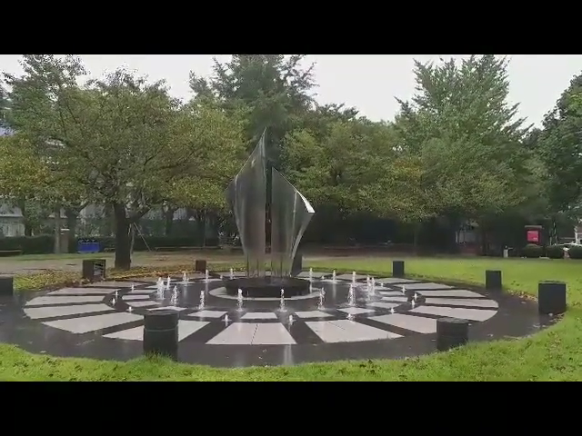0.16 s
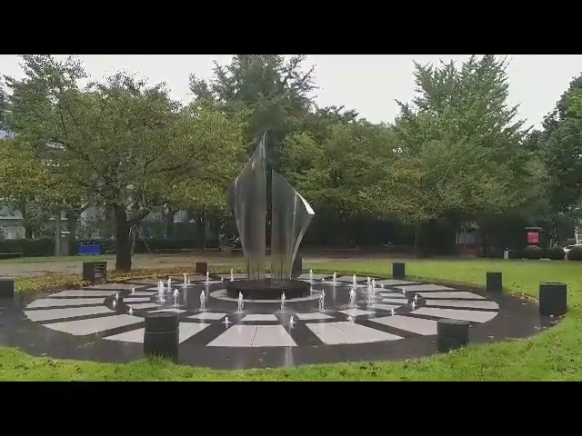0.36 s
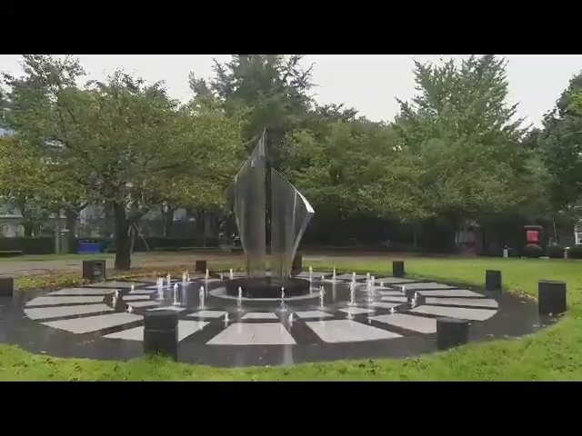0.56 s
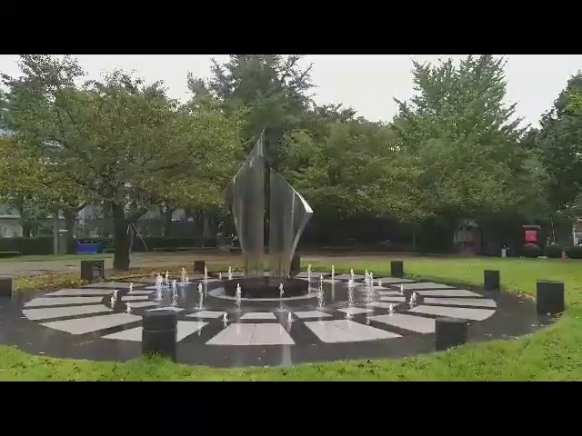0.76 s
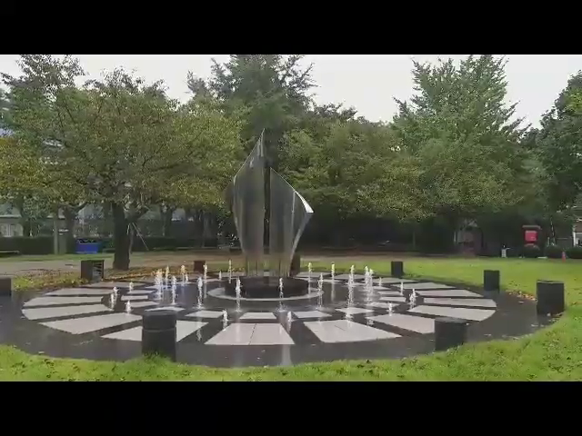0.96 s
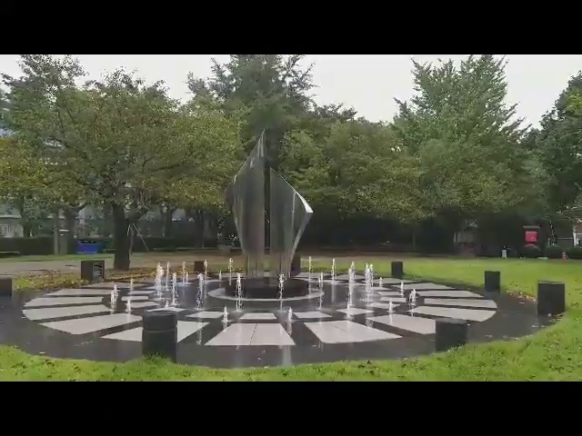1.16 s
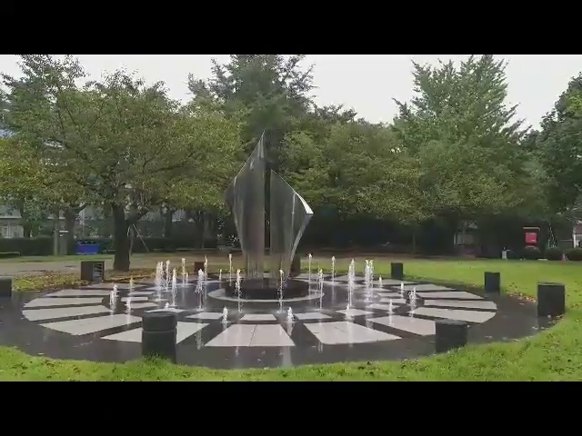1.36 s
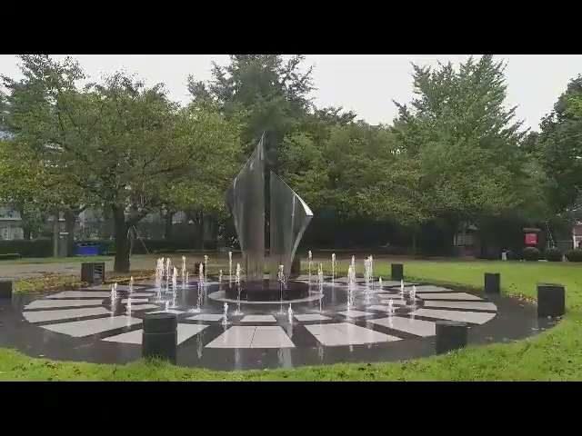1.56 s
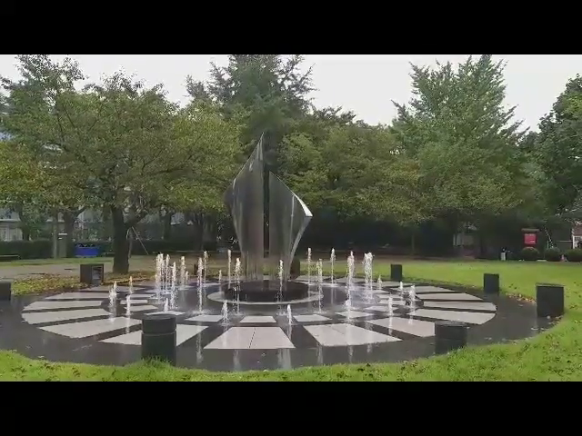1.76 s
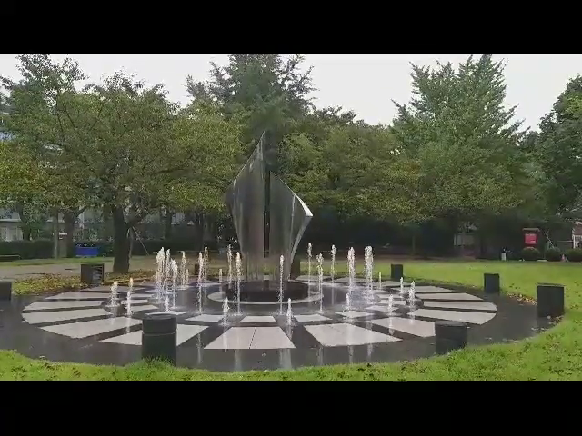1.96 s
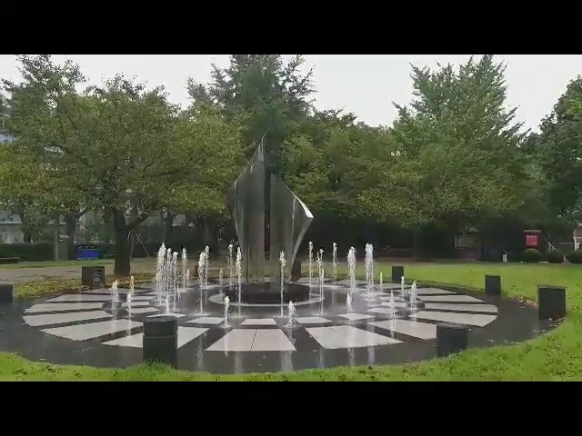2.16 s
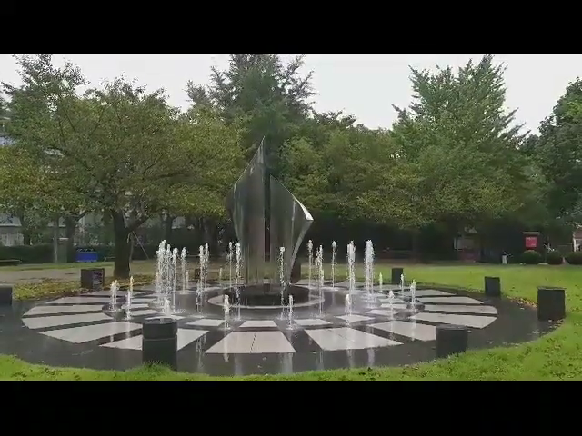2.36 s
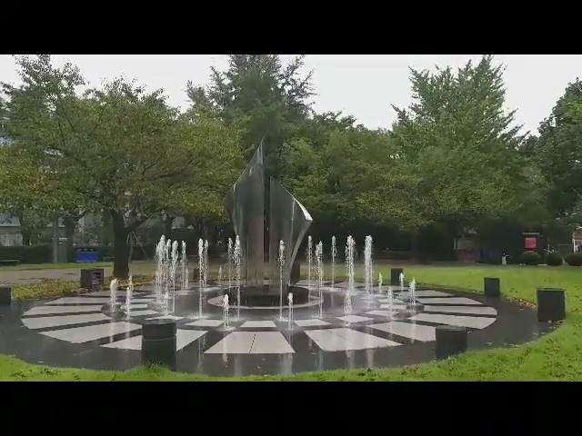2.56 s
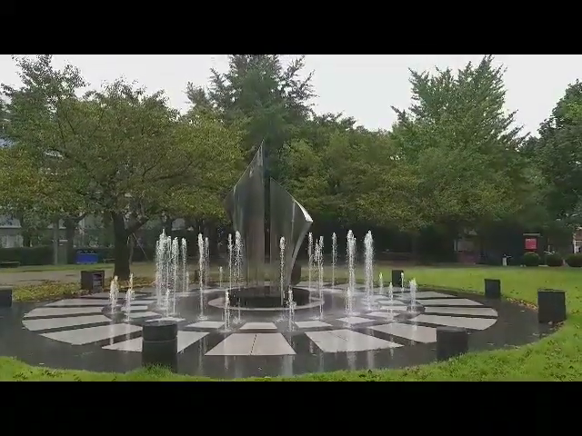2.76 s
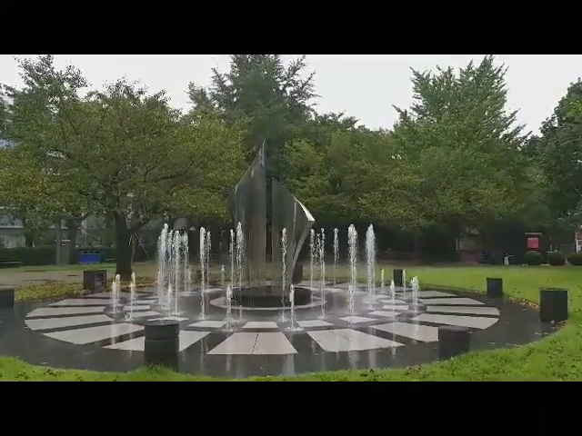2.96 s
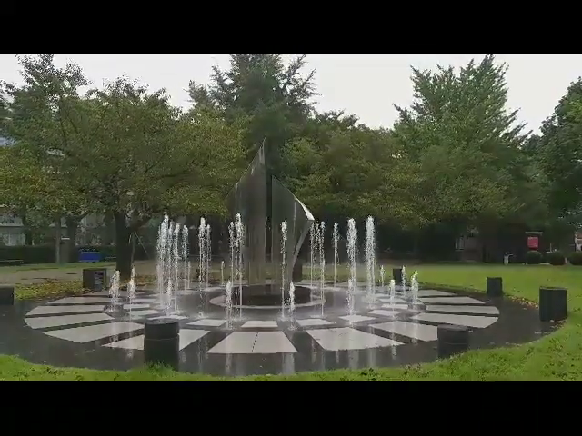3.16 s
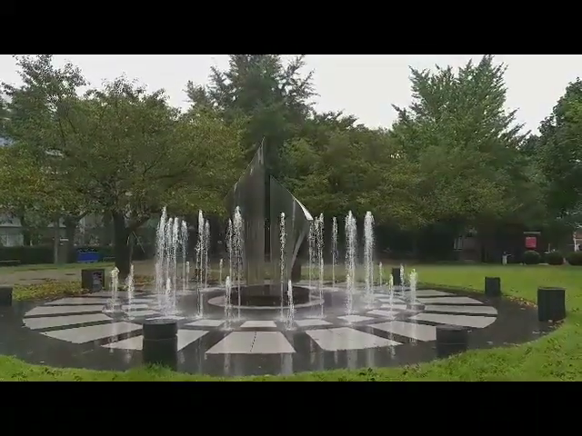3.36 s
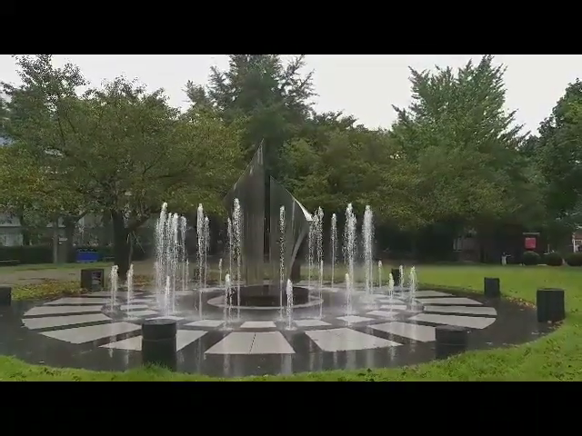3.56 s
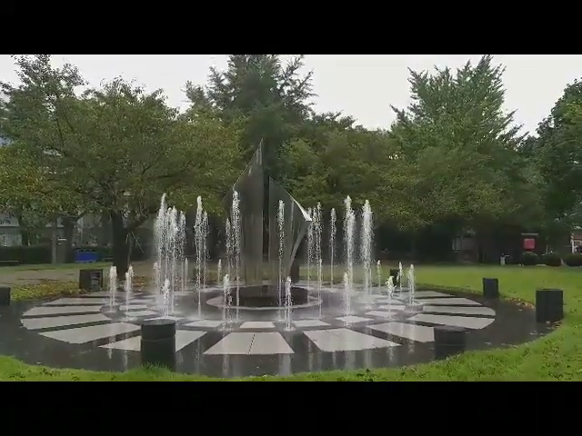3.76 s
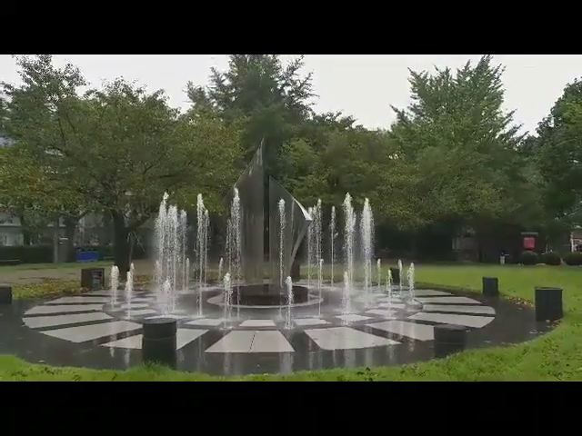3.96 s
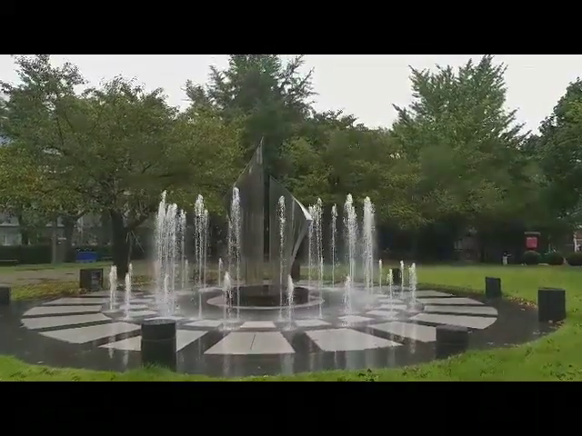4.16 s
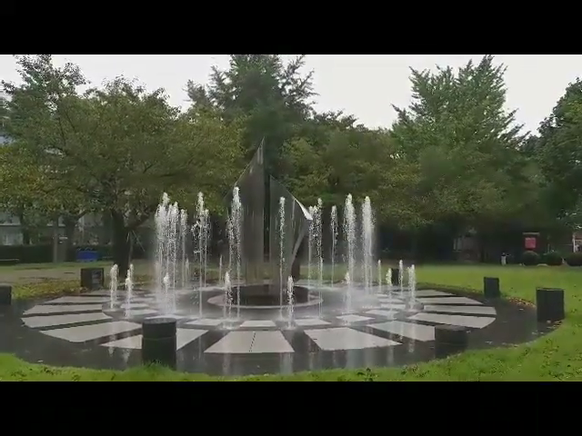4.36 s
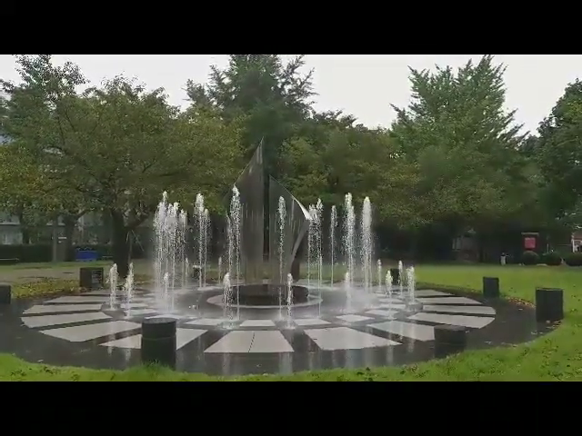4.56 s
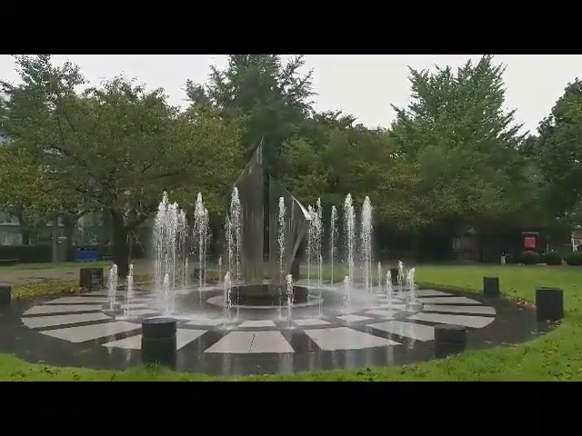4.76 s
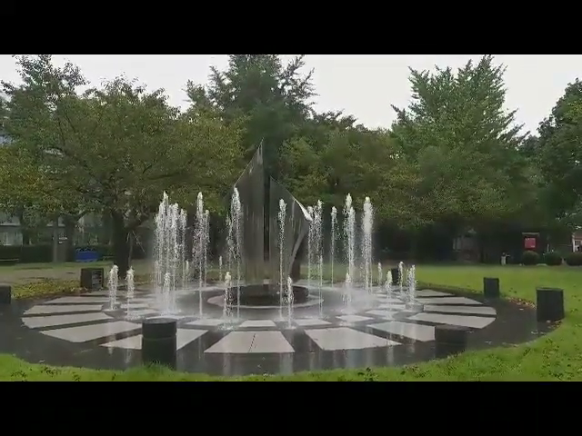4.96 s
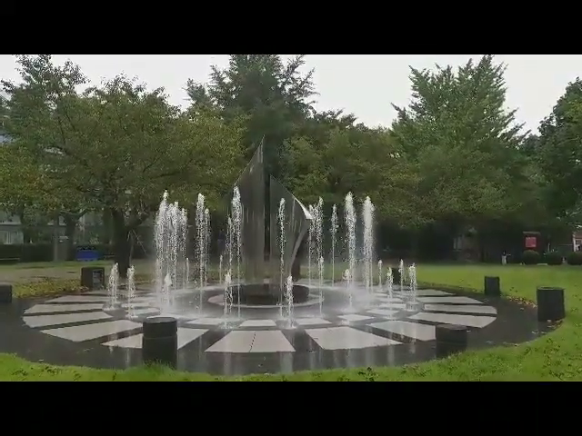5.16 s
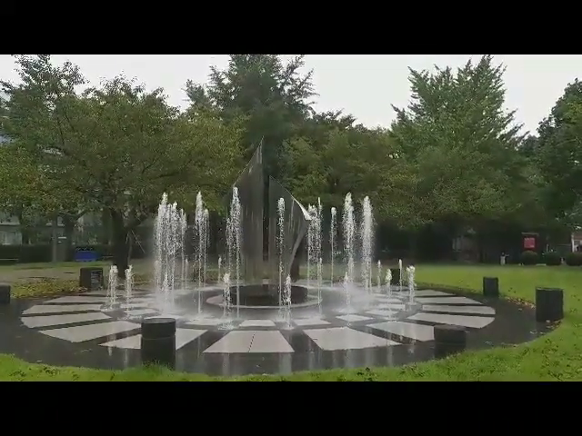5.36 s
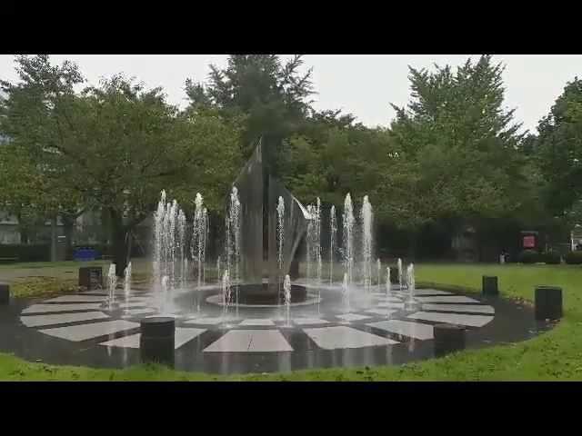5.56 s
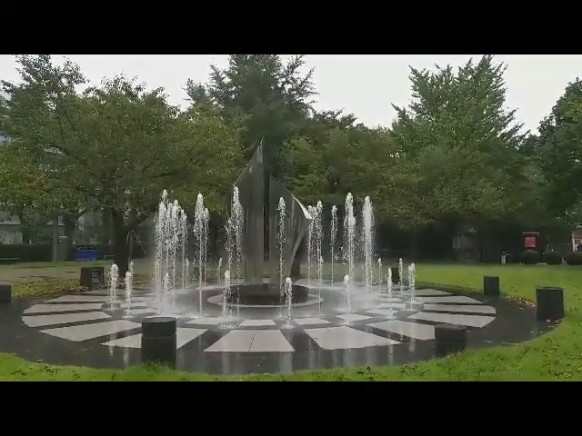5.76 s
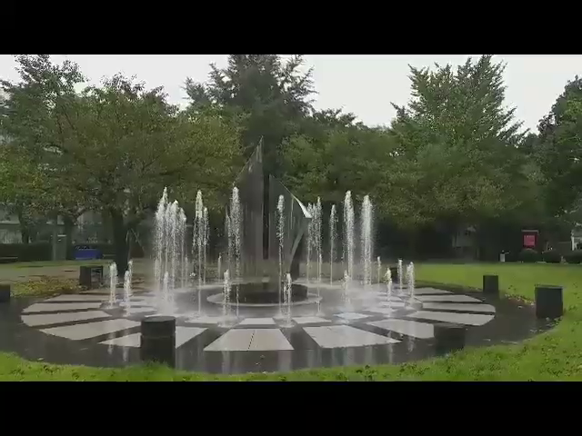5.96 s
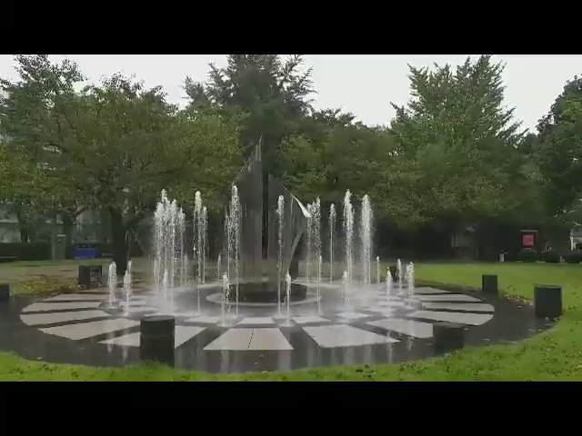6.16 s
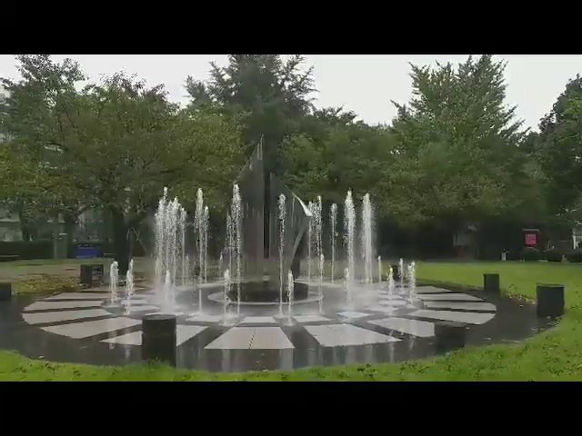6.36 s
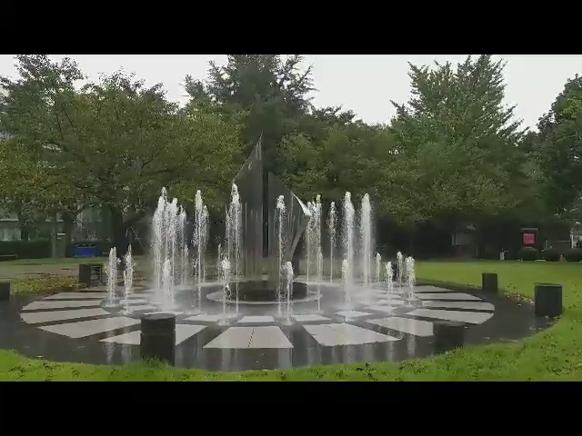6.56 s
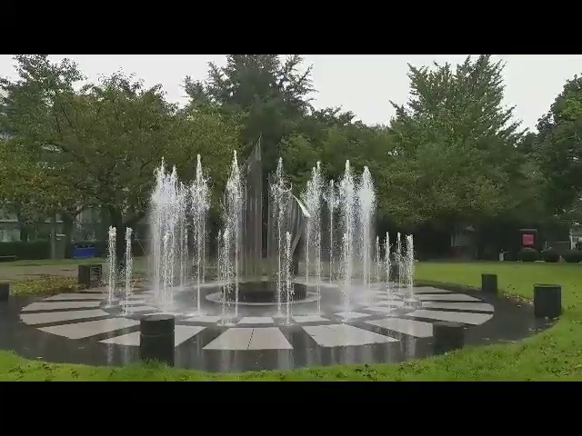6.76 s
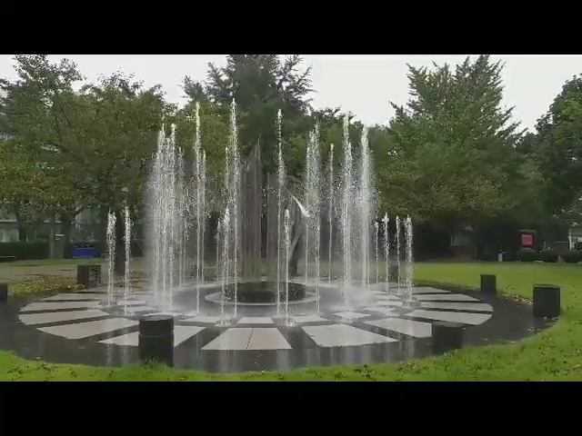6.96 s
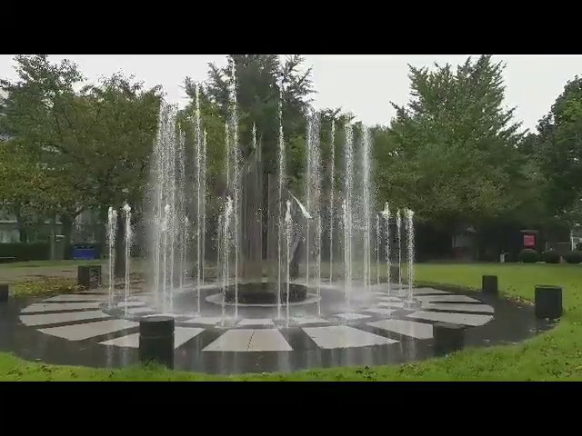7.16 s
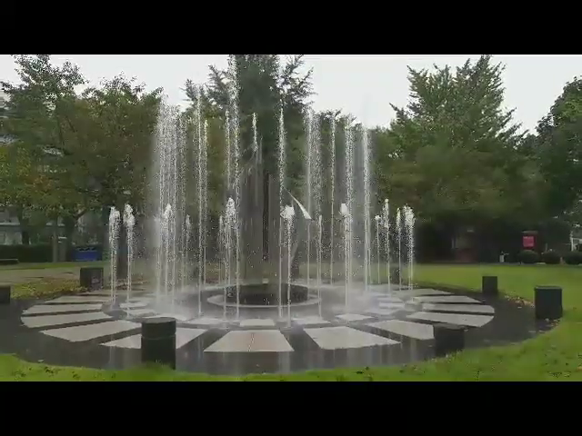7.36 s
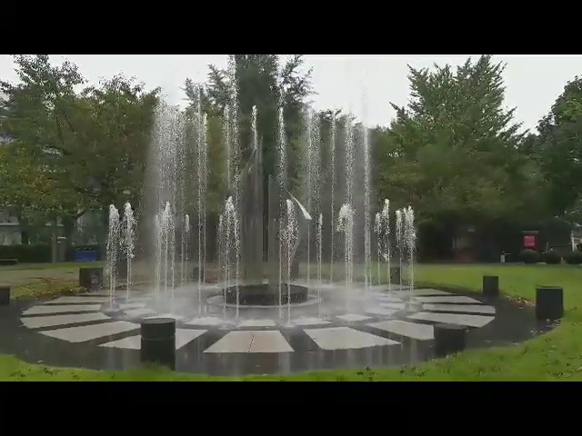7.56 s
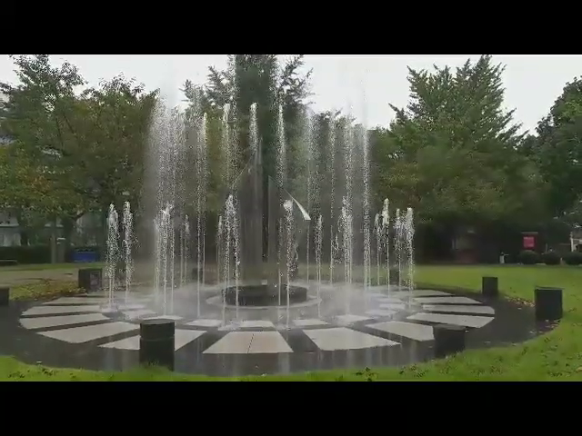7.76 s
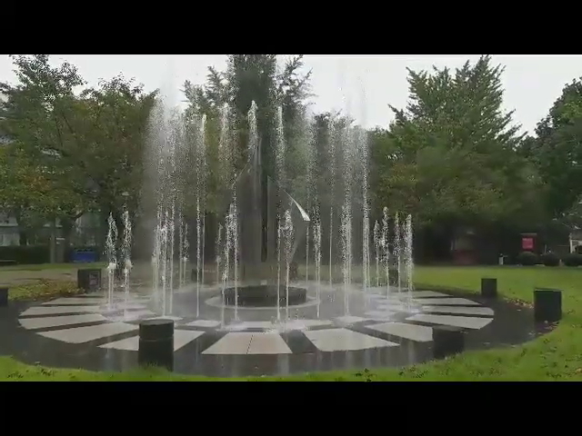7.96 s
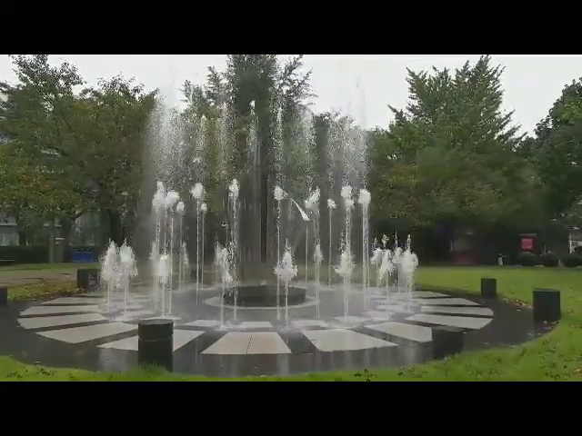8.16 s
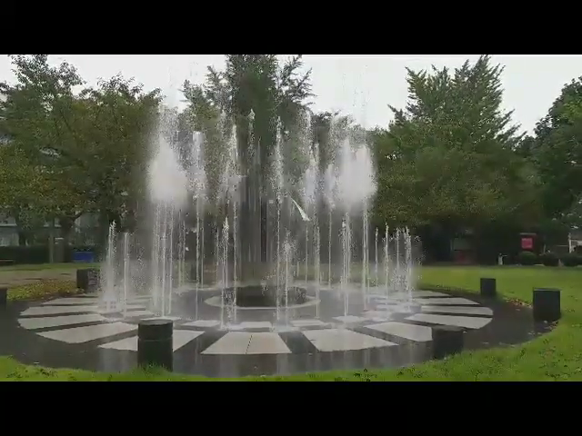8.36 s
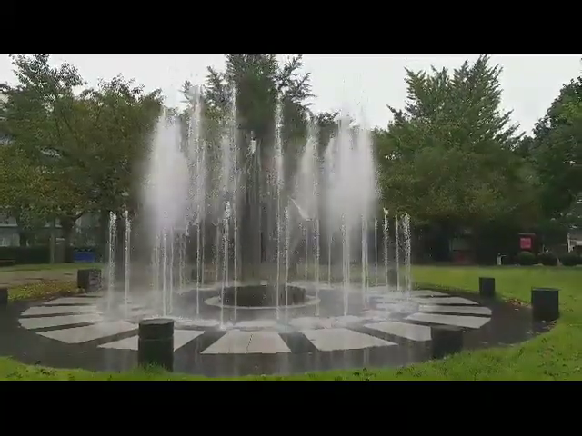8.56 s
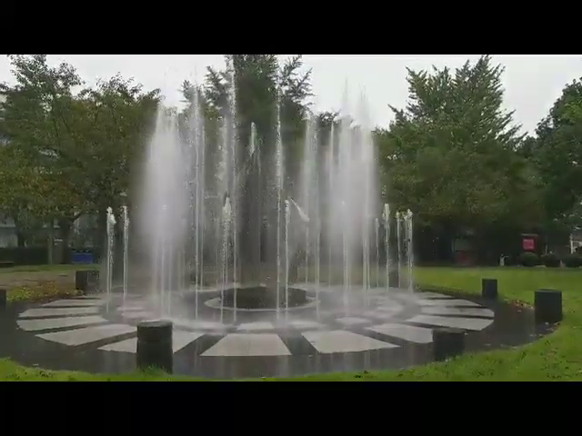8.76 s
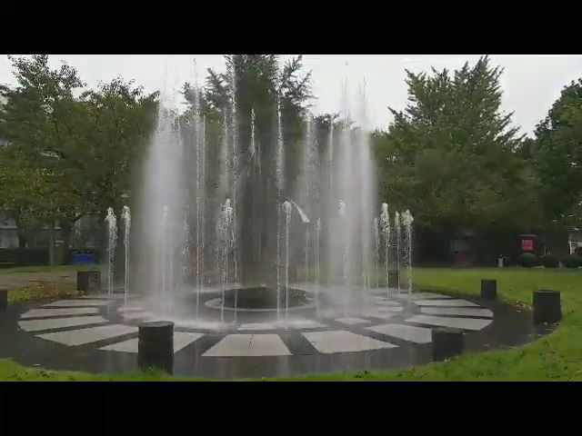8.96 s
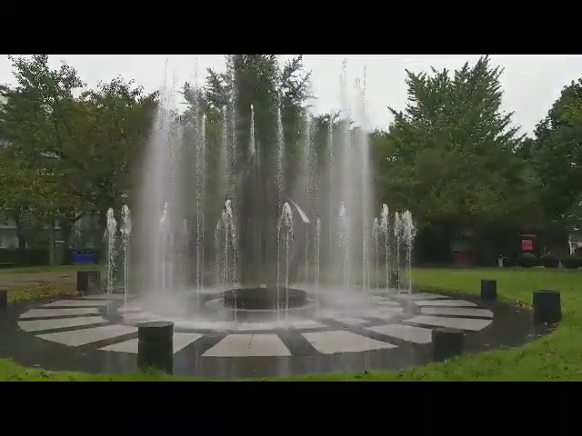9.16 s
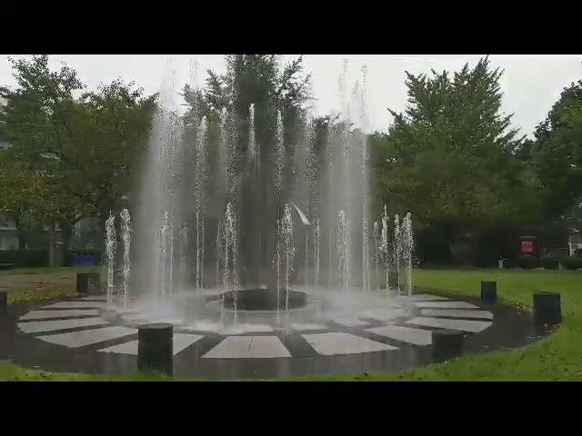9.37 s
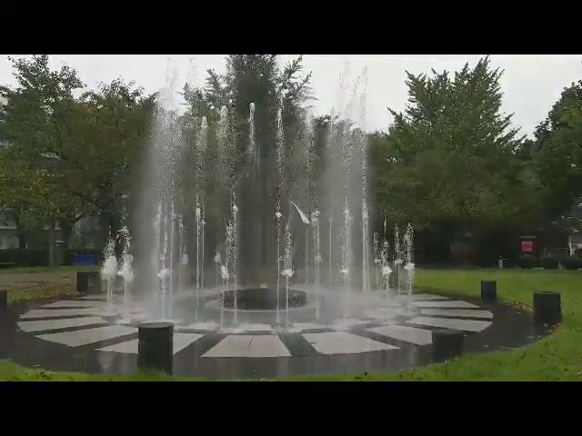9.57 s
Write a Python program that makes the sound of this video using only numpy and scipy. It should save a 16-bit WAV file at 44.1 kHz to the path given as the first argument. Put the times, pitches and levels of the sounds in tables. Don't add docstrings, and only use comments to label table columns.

```python
import sys
import numpy as np
from scipy import signal
from scipy.fft import rfft, irfft, next_fast_len
from scipy.io import wavfile
from scipy.ndimage import uniform_filter1d, map_coordinates

SR = 44100
rng = np.random.default_rng(int(sys.argv[2]) if len(sys.argv) > 2 else 0)


def amp(db):
    return 10 ** (np.asarray(db, float) / 20)


def write(x):
    x = np.atleast_2d(x).T
    wavfile.write(sys.argv[1], SR, np.round(np.clip(x, -1, 1) * 32767).astype(np.int16))


N = 424683

FULL_DB = -27
THUD_S, THUD_LENGTH_S, THUD_DB = 9.27, 0.14, 4.5

# (time [s], half length [s], swell [dB])
CARS = [(.3, .3, 2.8), (2.05, 0.082, 2.7), (4.3, .3, 5.6), (6.3, 0.35, 3), (6.75, .1, 3.4), (8, .1, 3),
        (8.6, .1, 2), (9.3, .1, 3.7)]


def along(points, hz):
    point_hz, value = np.transpose(points)
    return np.interp(np.log(hz + 1), np.log(point_hz + 1), value)


def unit(x):
    return x / np.sqrt(np.mean(x ** 2) + 1e-20)


def curves(rows):
    time_s, *columns = np.transpose(rows)
    return [np.interp(np.arange(N) / SR, time_s, column) for column in columns]


def swells(rows):
    t = np.arange(0, N + 64, 64) / SR
    time_s, half_s, *columns = np.transpose(rows)
    bells = np.exp(-.5 * ((t[:, None] - time_s) / half_s) ** 2)
    return [np.interp(np.arange(N) / SR, t, bells @ column) for column in columns]


def wobble(rate_hz):
    coarse = np.arange(0, N + 64, 64)
    knots = rng.standard_normal(int(N * 60 / SR) + 4)
    values = map_coordinates(knots, [coarse * min(rate_hz, 59) / SR])
    return np.interp(np.arange(N), coarse, values)


def filtered(x, response):
    m = next_fast_len(N + 8192)
    return irfft(rfft(x, m) * response(np.fft.rfftfreq(m, 1 / SR)), m)[..., :N]


def causal(db):
    cepstrum = irfft(db * np.log(10) / 20)
    i = np.arange(len(cepstrum))
    fold = np.where(i < len(i) // 2, 2, 0) / np.where(i == 0, 2, 1)
    return np.exp(rfft(cepstrum * fold))


def shell_db(hz):
    # (centre [Hz], width [Hz], gain [dB])
    resonances = [(432, 69, -8.5), (959, 93, -5), (1200, 130, -0.5), (1605, 116, -4), (1910, 267, 5),
                  (2206, 103, -4), (2490, 130, 1.5), (2795, 153, -4.5), (3110, 160, 2), (3450, 160, -2),
                  (3690, 150, 2.5), (5600, 90, -2), (6110, 71, -5), (6620, 92, -4), (7180, 140, -3),
                  (14900, 300, 5), (15450, 150, 1)]
    return sum(db * np.exp(-.5 * ((hz - c) / w) ** 2) for c, w, db in resonances)


def coloured(spectrum):
    noise = rng.standard_normal(N)
    return unit(filtered(noise, lambda hz: amp(along(spectrum, hz) + shell_db(hz))))


def size_levels():
    # (time [s], flow of landing water [dB], how broken the columns are [0-1])
    jets = [(0, -43.5, 0.1), (.8, -43, 0.14), (1.45, -39.5, 0.3), (1.75, -37, 0.25), (2.4, -33, 0.03),
            (3, -30, 0.04), (3.6, -28.5, .2), (4.3, -27, 0.34), (5, -27.5, 0.45), (6, -26.5, .3),
            (7, -26.5, 0.37), (7.4, -28, 0.54), (7.9, -28, 0.67), (8.4, -27.5, 0.58), (8.8, -29, 0.95),
            (9.2, -27.5, 1), (9.63, -29, .9)]
    # (time [s], half length [s], swell [dB], weight [dB])
    sheets = [(.25, 0.074, 0.5, 0), (.62, 0.037, 2.5, -1), (1.68, 0.034, 3.5, -0.5), (1.92, 0.043, 3, -2.5),
              (2.62, 0.035, 1.5, -1), (2.8, 0.045, 0, 2.5), (3.43, 0.029, 1.5, -2.5), (4.05, 0.031, 0, 2),
              (4.55, 0.067, 0.5, 2), (4.85, 0.073, 2, 0), (5.1, .03, 1.5, 0), (5.3, 0.035, 2.5, 0.5),
              (5.6, .06, 0.5, 1.5), (5.89, 0.027, 2, 0.5), (6.08, 0.019, 2, 1.5), (6.27, .04, 1, 0.5),
              (6.46, 0.024, 1, 1.5), (6.8, 0.089, 1, 0), (7.15, 0.069, 1.5, -0.5), (7.63, 0.095, 3.5, -0.5),
              (8.03, .08, 1, 3.5), (8.3, 0.05, 1, 2), (8.6, 0.064, 1.5, 3.5), (9.27, 0.18, 1.5, 2),
              (9.56, 0.051, 1, 1.5)]
    # (level over flow [dB], growth with flow [dB/dB], gain when fully broken [dB], share of sheet weight [0-1])
    answers = [
        (-7, 0.89, 1.5, 1),
        (0, 1.01, 0, 0.088),
        (-4.5, 0.99, 3, .1),
        (-9, 0.97, 6, 0),
    ]
    flow_db, broken = curves(jets)
    swell_db, weight_db = swells(sheets)
    levels = []
    for db, grows, broken_db, heavy in answers:
        steady_db = FULL_DB + db + grows * (flow_db - FULL_DB)
        levels.append(steady_db + broken_db * broken + swell_db + heavy * weight_db)
    return levels


def size_colour(low_hz, high_hz):
    # (frequency [Hz], density [dB per Hz])
    water_colour = [(500, -10), (800, -14.5), (1300, -9), (2000, -5.5), (3000, -5.5), (4200, 0),
                    (5500, -3.5), (6600, -7.5), (8500, -5), (9400, -5), (10200, -11), (12200, -8.5),
                    (13600, -11.5), (15500, -21.5)]
    hz = np.fft.rfftfreq(4096, 1 / SR)
    edge_db = -10 * np.log10((1 + (low_hz / (hz + 1)) ** 8) * (1 + (hz / high_hz) ** 8))
    response = irfft(causal(along(water_colour, hz) + shell_db(hz) + edge_db))
    return response / np.linalg.norm(response)


def impacts(rate_hz, spread_db, clump):
    hit = rng.random(N) < rate_hz / SR * clump
    return hit * amp(np.minimum(2 * spread_db * rng.exponential(1, N), 24))


def burst(power, t60_s):
    t = np.arange(900) / SR
    shape = amp(-120 * t / t60_s) * (1 - np.exp(-t / 0.00024))
    envelope = np.sqrt(np.abs(signal.oaconvolve(power, shape / shape.sum())[:N]))
    return envelope * rng.standard_normal(N)


def plops(rate_hz, centre_hz, cycles):
    when, pitch, rarity = np.split(rng.random((6000, 3))[:int(rate_hz * N / SR)], 3, axis=1)
    hz = centre_hz * np.exp(1.314 * (pitch - .5))
    turns = hz * np.arange(300) / SR
    tone = np.sin(2 * np.pi * turns * (1 + 0.012 * turns))
    ring = tone * np.exp(-turns / cycles) * (1 - np.exp(-2 * turns))
    strength = (rarity + 0.081) ** -.5
    at = (when * N).astype(int) + np.arange(300)
    return unit(np.bincount(at.ravel(), (strength * ring).ravel(), N + 400)[:N])


def steadied(x, seconds):
    return x / np.sqrt(np.abs(uniform_filter1d(x ** 2, int(seconds * SR))) + 1e-9)


def splats(size, t60_s):
    # (time [s], peak [dB], body [dB], fizz [dB])
    ticks = [(0.0468, -23, -9, -22), (0.1875, -27, -15, -14), (0.3167, -25, -19, -16),
             (0.9103, -25, -4, -12), (0.9732, -24, -19, -16), (1.0056, -20, -17, -16),
             (1.0867, -18.5, -14, -20), (1.1423, -22, -25, -7.5), (1.196, -24, -13, -12),
             (1.3049, -24, -16, -13), (1.5474, -20, -7, -13), (1.5778, -23.5, -11, -12),
             (1.6096, -20, -17, -18), (1.6511, -21, -15, -16), (1.7794, -27, -14, -6),
             (1.8414, -20, -19, -15), (2.1246, -18, -14, -14), (2.2797, -20, -15, -13),
             (2.3306, -17, -17, -16), (2.4563, -19, -17, -13),
             (2.8483, -17, -8, -9), (3.1986, -11, -12, -22), (3.381, -9, -23, -20),
                   (3.44, -5, -27, -25), (3.5063, -9, -11, -22), (3.6694, -9.5, -10, -19),
                   (3.8355, -8.5, -10, -17), (3.9453, -10, -19, -17), (4.1513, -15, -19, -21),
                   (4.3398, -11, -12, -14), (4.4444, -11, -17, -16), (5.0654, -12.5, -21, -5),
                   (5.4303, -10.5, -7, -20), (5.6035, -8.5, -14, -13), (5.7792, -11, -10, -12),
                   (6.086, -8, -19, -20), (6.23, -5.5, -13, -19), (6.377, -9, -7, -15),
                   (6.4755, -14, -19, -9), (6.6228, -11, -8, -13), (6.7938, -10, -20, -16),
                   (6.9449, -10, -13, -17), (7.1559, -9.5, -18, -18), (7.324, -12, -20, -17),
                   (7.4105, -7, -18, -16), (7.5623, -8, -16, -14), (8.3263, -13, -24, -11),
                   (9.5333, -7, -28.5, -21)]
    # (time [s], peak [dB], brightness [dB])
    slaps = [(2.5172, -18, -6), (2.8487, -9.5, -14), (3.0086, -15, -10), (3.1981, -25, -1),
             (3.5783, -19, -7), (3.9449, -17, -3), (4.0392, -13, -12), (4.1682, -14, -7),
             (4.278, -14.5, -5), (4.6788, -15.5, -7), (4.8225, -15, 3), (4.9205, -15, -5), (5.094, -17, 3),
             (5.2388, -14, -5), (6.2297, -15, -1), (6.2716, -13, -7), (6.3756, -15, -3), (6.609, -22, -5),
             (6.798, -19, 0), (6.8402, -18, -4), (7.3891, -20, -1), (7.5283, -15, -8), (7.865, -13, -13),
             (8.1085, -14, -12), (8.1474, -15.5, -10), (8.2037, -14.5, 2), (8.4198, -17, -9),
             (9.0128, -13.5, -5), (9.2184, -19, -11), (9.3297, -14, -8)]
    slap_share_db = [13.5, 9.8, 6, 2]
    tick_share_db = [13.5, 9.9, 21.5, 13]
    slap_lag_s, slap_click_db, slap_puff_db = 0.00179, -2.5, -4.5
    tick_lag_s, tick_click_db, tick_puff_db = 0.00119, -0.5, -3.5

    slap_s, peak_db, bright_db = np.transpose(slaps)
    tick_s, tick_peak_db, body_db, fizz_db = np.transpose(np.array(ticks))
    slap_db = peak_db + slap_share_db[size] + (size > 0) * bright_db
    tick_db = tick_peak_db + tick_share_db[size] + [body_db, 0, fizz_db, fizz_db][size]

    puff_at = np.round(np.r_[slap_s, tick_s] * SR).astype(int)
    puff_power = amp(2 * np.r_[slap_db + slap_puff_db, tick_db + tick_puff_db])
    click_at = np.round(np.r_[slap_s + slap_lag_s, tick_s + tick_lag_s] * SR).astype(int)
    click_level = amp(np.r_[slap_db + slap_click_db, tick_db + tick_click_db])
    return burst(np.bincount(puff_at, puff_power, N), t60_s) - np.bincount(click_at, click_level, N)


def water():
    # (low [Hz], high [Hz], impacts [1/s], size spread [dB], burst t60 [s], smooth rush [dB])
    sizes = [
        (947, 2865, 300, 4.5, 0.009, 0.5),
        (2850, 6620, 500, 6, 0.0086, 3),
        (6940, 10200, 500, 6.5, 0.007, 3.5),
        (10200, 16200, 500, 11, 0.0082, 2),
    ]
    surge = wobble(40)
    whole = impacts(150, 2.3, amp(2.1 * surge))
    out = np.zeros(N)
    for k, (level_db, row) in enumerate(zip(size_levels(), sizes)):
        low_hz, high_hz, rate_hz, spread_db, t60_s, rush_db = row
        own = impacts(rate_hz, spread_db, amp(2.5 * wobble(30)))
        strikes = unit(burst(own / own.mean() + 0.43 * whole / whole.mean(), t60_s))
        clicks = unit(np.sqrt(own) - np.sqrt(own).mean())
        strikes = strikes - 0.5 * clicks
        rush = amp(rush_db) * rng.standard_normal(N)
        pockets = amp(-16.5) * plops(170, np.sqrt(low_hz * high_hz), 4.6)
        flow = amp(0.41 * surge + 0.43 * wobble(32)) * (unit(strikes + rush) + pockets)
        falling = amp(level_db) * steadied(flow, 0.085)
        near = splats(k, 1.6 * t60_s)
        out += signal.oaconvolve(falling + near, size_colour(low_hz, high_hz))[:N]
    return out


def drone():
    # (city [dB], share of a car's swell [0-1], drumming over lumps [dB], growth with lumps [dB/dB])
    parts = [
        (-66, 0.96, -28.5, 0.74),
        (-52, .2, -17, 0.83),
    ]
    # (frequency [Hz], density [dB per Hz])
    colours = [
        [(120, -41), (220, 2), (300, 1.5), (420, 3), (600, -21)],
        [(350, -14.5), (500, -3), (640, -0.5), (900, -3.5), (1200, -1.5), (2500, -54)],
    ]
    cars_db, = swells(CARS)
    thud_db, = swells([(THUD_S, THUD_LENGTH_S, THUD_DB)])
    lumps_db = size_levels()[0] + thud_db
    out = 0
    for (city_db, share, drum_db, grows), colour in zip(parts, colours):
        city = amp(city_db + share * cars_db)
        drumming = amp(FULL_DB + drum_db + grows * (lumps_db - FULL_DB))
        out = out + np.hypot(city, drumming) * amp(0.84 * wobble(12)) * coloured(colour)
    return out


def traffic():
    # (frequency [Hz], density [dB per Hz])
    hum = [(20, -42), (40, -11), (70, -7), (130, -0.5), (200, -6), (300, -25), (600, -45)]
    steady_db = -59.5
    cars_db, = swells(CARS)
    return amp(steady_db + cars_db + 0.93 * wobble(4)) * coloured(hum)


def pump():
    # (multiple of pump speed [-], level [dB])
    multiples = [(4, -78), (5, -67), (6, -76), (7, -79), (8, -65), (9, -67), (10, -64.5), (11, -74),
                 (13, -72), (15, -79)]
    speed_hz = 15.0
    turns = np.cumsum(speed_hz * (1 + 0.0013 * wobble(1.47))) / SR
    out = np.zeros(N)
    for k, db in multiples:
        out += amp(db + 1.4 * wobble(1.74)) * np.sin(2 * np.pi * (k * turns + rng.random()))
    return out


def plunge():
    # (frequency [Hz], density [dB per Hz])
    roar = [(400, -28), (700, -6.5), (1150, 1), (1700, -2), (2600, -30)]
    level_db = -35.5
    bell, = swells([(THUD_S, 1.04 * THUD_LENGTH_S, 1)])
    return amp(level_db + 1.8 * wobble(30)) * bell * coloured(roar)


def scene():
    front = water() + drone() + traffic() + pump() + plunge()
    return np.array([front, front])


def roll_off(x):
    return signal.sosfilt(signal.butter(12, 16850, fs=SR, output="sos"), x)


def record(dry):
    # (centre [Hz], width [Hz], side share, + left [-])
    port_resonances = [(1870, 340, 0.22), (9800, 590, -0.28)]
    # (low [Hz], high [Hz])
    apart_bands = [(1640, 2330), (8960, 10330)]
    low_cut_hz, top_hz = 45, 15540

    def microphone(f):
        return (f < top_hz) * f ** 2 / (f ** 2 + low_cut_hz ** 2)

    def ports(f):
        kept = sum((f > low) & (f < high) for low, high in apart_bands)
        return kept * sum(g * 1j * f * w / (c * c - f * f + 1j * f * w) for c, w, g in port_resonances)

    mid = filtered(dry.mean(axis=0), microphone)
    scatter = rng.standard_normal(4000) / np.sqrt(4000)
    scattered = amp(-5) * signal.oaconvolve(mid, scatter, "same")
    side = filtered(mid + scattered, ports)
    return roll_off(np.array([mid + side, mid - side]))


dry = scene()
out = record(dry)
write(out)
```